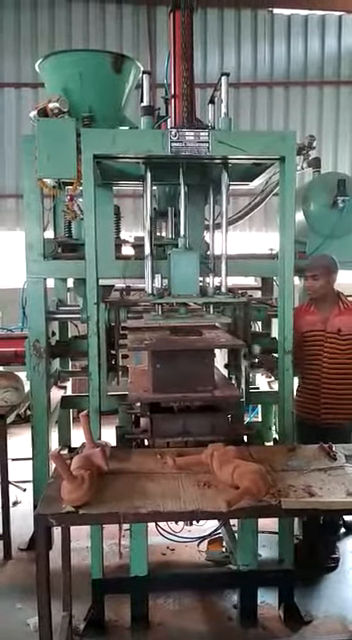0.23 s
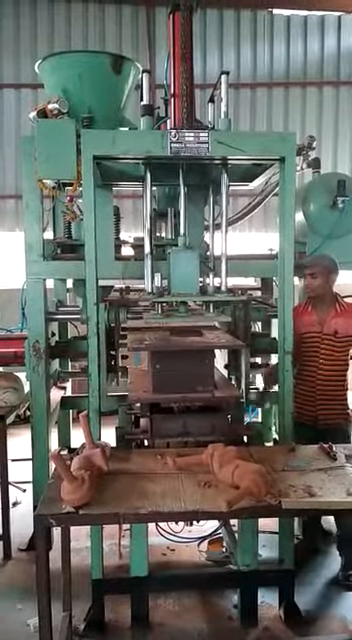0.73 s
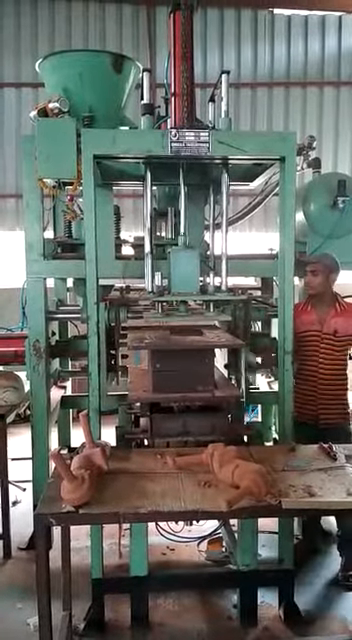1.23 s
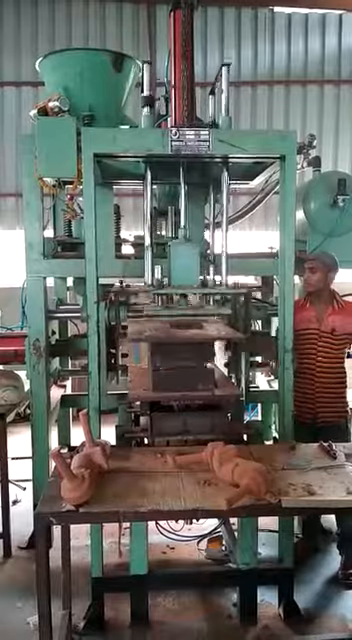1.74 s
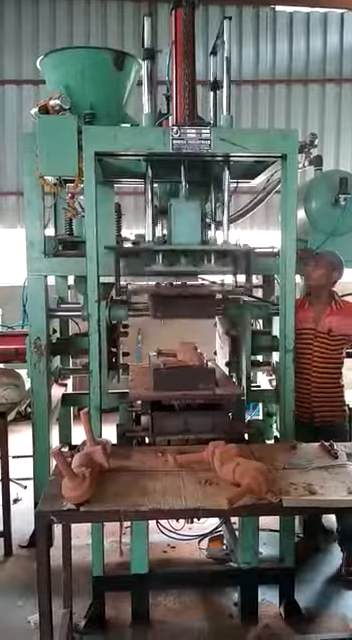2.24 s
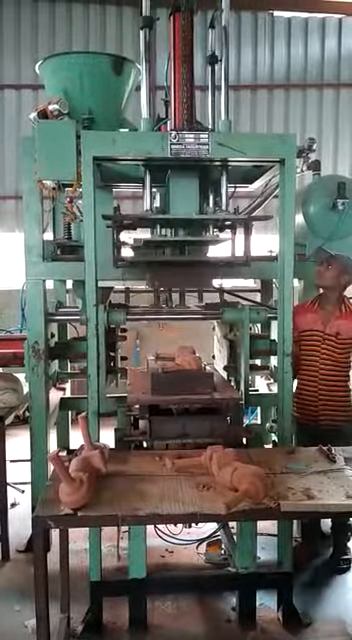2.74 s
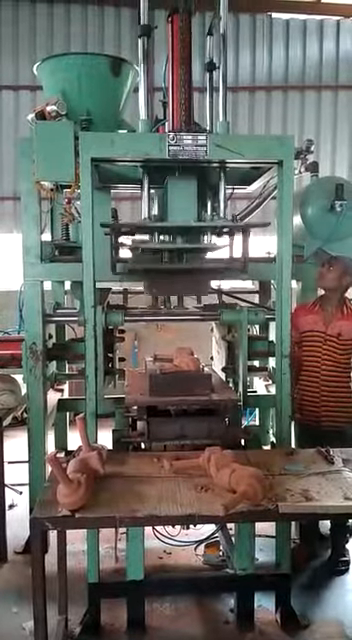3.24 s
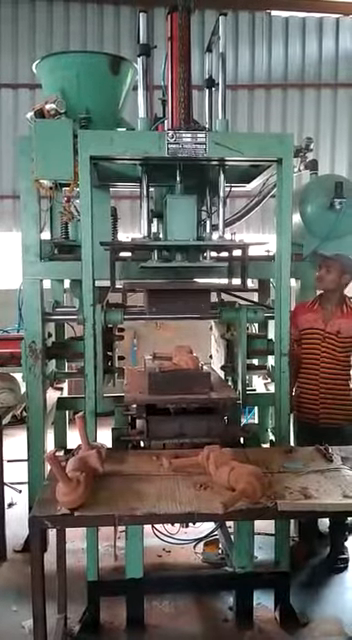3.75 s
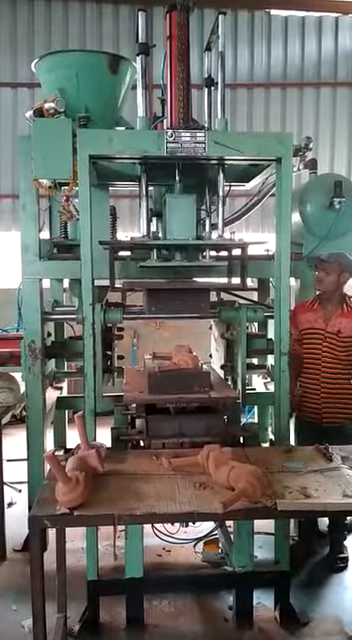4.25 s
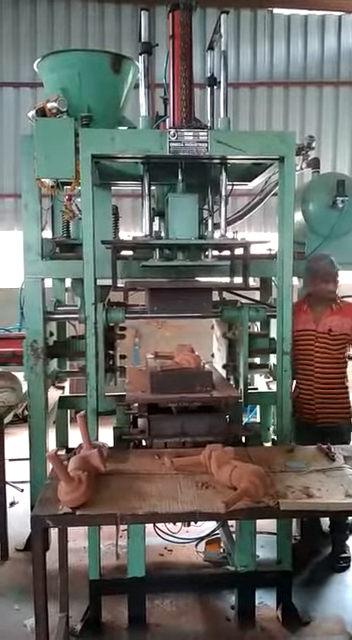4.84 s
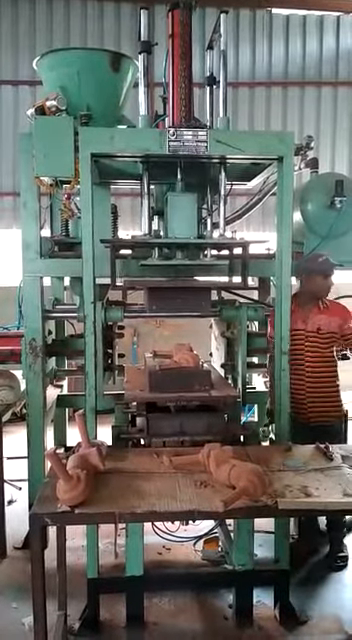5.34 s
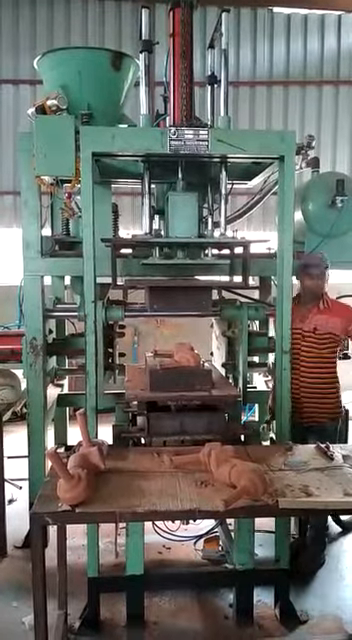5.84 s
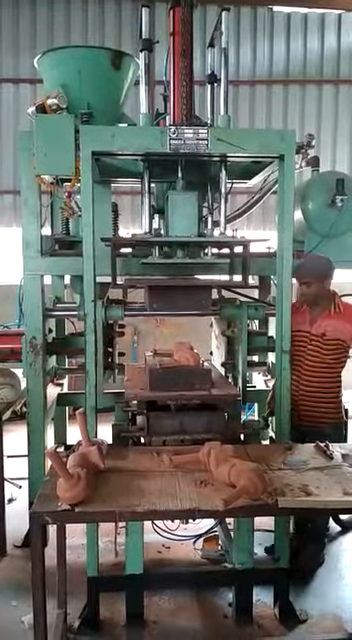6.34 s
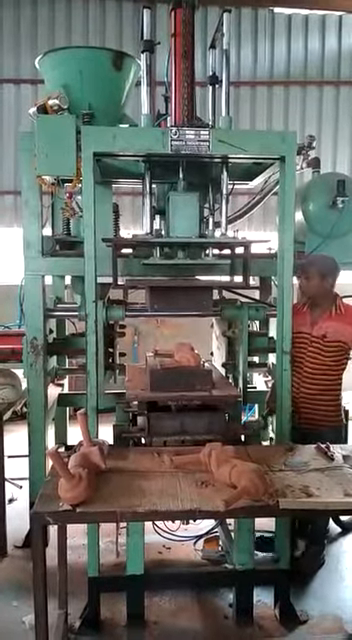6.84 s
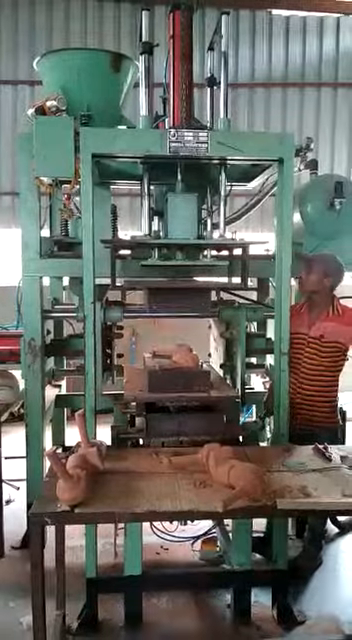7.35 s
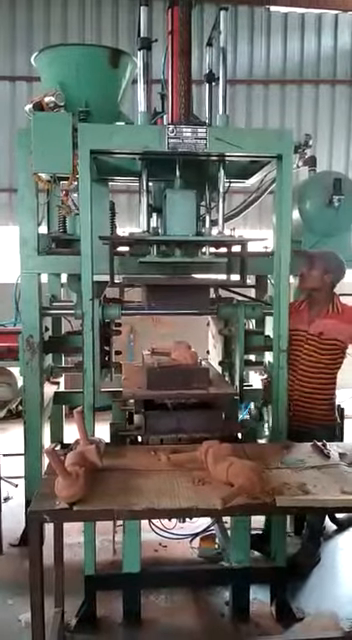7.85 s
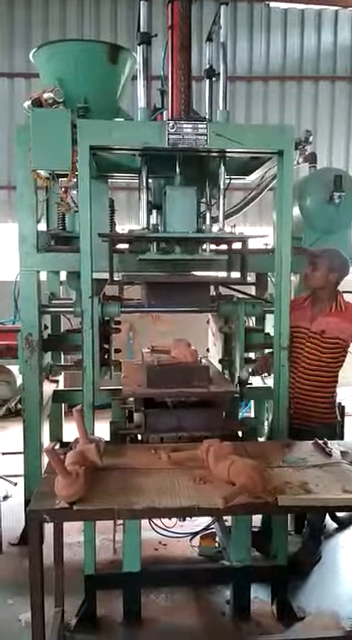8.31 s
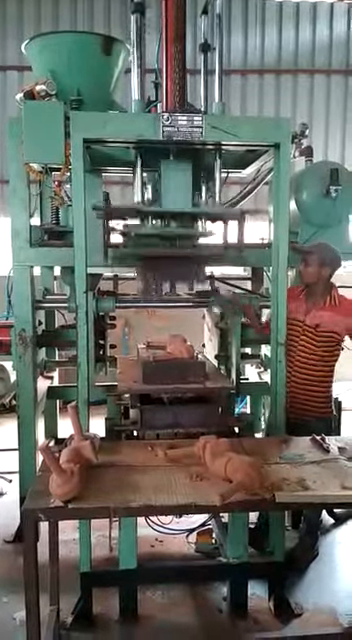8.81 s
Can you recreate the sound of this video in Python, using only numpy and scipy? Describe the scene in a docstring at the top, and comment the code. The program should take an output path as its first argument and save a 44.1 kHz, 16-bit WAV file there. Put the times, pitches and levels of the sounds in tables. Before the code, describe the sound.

A pneumatic foundry press hisses and hammers, steel tooling clanks, then a roaring air blast and sharp exhaust, ending with a rising hiss and loud clank.

```python
"""A pneumatic core shooter runs through a cycle in a sheet-metal workshop, over motor hum, hall murk and leak hiss.
First a loose part hammers in even thuds while valves vent coloured noise; pistons push air through their ports.
From 1.2 s steel tooling clanks as decaying modes and noise, slides in chattering noise, and seals groan as sines.
After a puff, the sand shot at 3.9 s and the blow-down at 4.5 s roar as noise through the head's resonances.
A last stroke from 7.4 s whistles and whines up to the closing clank at 8.8 s; a low shudder comes and goes."""
import sys
import numpy as np
from scipy import signal
from scipy.fft import rfft, irfft, next_fast_len
from scipy.io import wavfile
from scipy.ndimage import uniform_filter1d, map_coordinates

SR = 44100
rng = np.random.default_rng(int(sys.argv[2]) if len(sys.argv) > 2 else 0)


def to_wav(sig):
    """Store sig (one row per channel, or 1-D mono) as 16-bit WAV at the path in sys.argv[1].

    Samples outside -1..1 are clipped; the rate is SR.
    """
    pcm = np.clip(np.atleast_2d(sig), -1, 1) * 32767
    pcm = np.round(pcm).astype(np.int16)
    wavfile.write(sys.argv[1], SR, pcm.T)  # frames by channels


N = 400428

# a small puff of air before the shot [t/s, attack/s, hold/s, level/dB]
PUFFS = [(3.322, 0.082, 0.37, -26.5)]
PUFF_SAG_DB_PER_S = 65
# the sand shot [t/s, attack/s, hold/s, level/dB]
SHOTS = [(3.861, 0.025, 0.22, -6.5)]
SHOT_SAG_DB_PER_S, SHOT_RELEASE_DB_PER_S = 87, 229
# the head blowing down, its valve first cracked and then wide open [t/s, hold/s, level/dB]
BLOWDOWNS = [(4.475, .04, -30), (4.511, 0.12, -12.5)]
BLOWDOWN_ATTACK_S, BLOWDOWN_SAG_DB_PER_S, BLOWDOWN_RELEASE_DB_PER_S = 0.013, 90, 318
# resonances of the shooting head [f/Hz, width/Hz, level in the shot/dB, level in the blow-down/dB]
HEAD_RESONANCES = [(174, 34, -30, 16.5), (289, 130, 16, 0), (392, 31, 17, 8), (780, 19, 13, 7),
                   (970, 38, 17.5, 13), (1083, 15, 12, -3), (1360, 5.8, 21, 15.5), (1597, 30, 5, 11.5)]
# air of puff, shot and blow-down [f/Hz, relative density/dB per Hz]
SHOT_SPECTRUM = [(60, -29), (170, -11.5), (900, -0.5), (1500, 7), (4000, -1.5), (7500, -8.5), (11500, -34),
                 (15000, -76)]

# air leaving the valve silencers [t/s, attack/s, hold/s, level/dB]
VENTS = [(0.35, 0.021, 0.62, -18.5), (0.817, 0.048, 0.023, -22.5), (3.178, 0.019, 0.48, -17.5),
         (3.861, 0.022, 0.019, -14.5), (4.505, 0.023, 0.051, -24), (4.581, 0.061, 0.038, -20.5)]
VENT_SAG_DB_PER_S, VENT_RELEASE_DB_PER_S = 12, 190
# air bleeding through a throttle [t/s, attack/s, hold/s, level/dB, drift/dB per s]
BLEEDS = [(0.37, 0.059, 0.76, -29, 4), (1.25, .17, 0.12, -31, -76), (1.78, 0.0038, 0.0043, -19, 0),
          (1.852, 0.16, 0.89, -55.5, 21.5), (4.57, 0.17, 0.983, -26.5, 3), (5.7, 0.11, 0.91, -42.5, 0.5),
          (7.4, 0.56, 0.87, -39.5, -11)]
BLEED_RELEASE_DB_PER_S = 266
# swells of the leaking fittings over their steady hiss [t/s, attack/s, hold/s, level/dB]
LEAK_SWELLS = [(4.348, 0.66, 2.66, -33.5)]
LEAK_DB, LEAK_SAG_DB_PER_S, LEAK_RELEASE_DB_PER_S = -43.5, 0.6, 17
# hisses of the vents, their top treble, the throttle and the leaks [f/Hz, relative density/dB per Hz]
VENT_SPECTRUM = [(100, -31.5), (1000, -31), (2200, -11.5), (4800, -10.5), (5200, -2.5), (9300, 2.5),
                 (11800, 8.5), (12400, -42), (15800, -50)]
TOP_TREBLE_SPECTRUM = [(10500, -44), (12600, -9), (15800, -24)]
BLEED_SPECTRUM = [(1000, -45), (4850, -13.5), (5100, 3), (6500, 6.5), (9400, 5), (9650, -12), (11200, 0),
                  (12700, -14), (15300, -12), (15600, -1)]
LEAK_SPECTRUM = [(1000, -34.5), (3500, -11), (6300, -4), (8500, -5.5), (11400, 4), (15800, -2)]

# steel meeting its stops and rebounding
# [t/s, clatter level/dB, low ring level/dB, brightness/dB per octave]
CONTACTS = [(1.161, -20.5, -40, -0.5), (1.178, -19, -10.5, -2), (1.214, -26.5, -10.5, -2.5),
            (1.272, -26, -15, 1), (1.389, -33, -18.5, -15), (1.783, -5.5, -0.5, -3.5), (1.827, -39, 0, -3),
            (1.907, -26, -14.5, -4), (2.013, -35, -20.5, -10), (3.869, -9.5, -3, -1),
            (4.462, -31, -35, -2.5), (8.793, -5, -3.5, -2.5), (8.942, -26, -26, -0.5),
            (8.98, -28.5, -29, 0.5)]
# higher modes of the steel frame [f/Hz, level/dB]
FRAME_MODES = [(535, -11.5), (694, -9), (790, -5), (926, -4), (1070, -7), (1340, -7)]
FRAME_T60_S = 0.29
# dense ringing of the steel plates [f/Hz, relative density/dB per Hz]
PLATE_SPECTRUM = [(100, -50), (290, -20.5), (400, -7.5), (650, -4), (1350, -6.5), (1900, -14),
                  (15000, -64.5)]
BEND_HZ, BEND_T60_S, BEND_RISE_S = 393.8, 0.18, 0.014  # the whole frame bending, its pitch before scatter

# piston strokes, heard as air in the ports [t/s, attack/s, hold/s, level/dB, drift/dB per s]
STROKES = [(0.341, 0.043, 0.5, -26.5, -0.5), (0.95, 0.21, 1.9, -36, -13), (2.024, .3, 0.55, -39, 5.5),
           (7.444, 0.043, 4.8, -41.5, 0)]
PORT_RELEASE_DB_PER_S = 116
# soft gusts from the cylinder ports [t/s, hold/s, level/dB]
PORT_GUSTS = [(2.47, 0.052, -41), (7.48, 0.098, -40.5), (7.77, 0.029, -44)]
GUST_ATTACK_S = 0.036
# air whistling in a port on the last stroke [t/s, attack/s, hold/s, level/dB, f/Hz, width/Hz]
WHISTLES = [(7.754, 0.55, 0.95, -43, 7910, 714)]
# piston seals singing as they slide [t/s, attack/s, hold/s, level/dB, f/Hz, glide/Hz per s]
SEAL_NOTES = [(2.418, 0.017, 0.013, -40.5, 487, 0), (2.539, 0.013, 0.06, -41, 475, -180),
              (2.668, 0.036, 0.065, -43.5, 451, -150), (7.4, 1.25, .12, -52.5, 785, 89.5)]
SEAL_RELEASE_DB_PER_S = 220
# air of the strokes and of the gusts [f/Hz, relative density/dB per Hz]
PORT_SPECTRUM = [(200, -13.5), (1250, -5.5), (1530, 6), (1950, 1.5), (3800, -5.5), (5300, -1.5),
                 (7400, 1.5), (9200, -14), (11700, 5.5), (15000, -22)]
GUST_SPECTRUM = [(1100, -22), (1480, -2), (2400, -14), (4500, -23)]

# tooling sliding along its guides [t/s, attack/s, hold/s, level/dB, drift/dB per s]
SCRAPES = [(1.234, 0.083, 0.94, -33, -24), (2.255, 0.09, .58, -49.5, 4), (7.9, 0.77, 0.74, -49, 30)]
SCRAPE_RELEASE_DB_PER_S = 80
# tooling catching on a guide [t/s, level/dB]
GUIDE_SNAGS = [(1.35, -30.5), (2.3, -36), (8.529, -38)]
SNAG_ATTACK_S, SNAG_HOLD_S, SNAG_RELEASE_DB_PER_S = 0.018, 0.047, 109
# resonance of the guide rods [f/Hz, width/Hz, level/dB]
ROD_RESONANCE = [(1520, 57, 14.5)]

# a loose part hammering [t/s, attack/s, hold/s, level/dB]
HAMMER_RUNS = [(-.015, 0, 0.408, -27.5), (0.054, 0.78, 0.04, -35.5)]
KNOCKS_PER_S, KNOCK_RELEASE_DB_PER_S = 22.9, 600
# panel modes rung by each knock [f/Hz, level/dB, t60/s]
HAMMER_MODES = [(121.5, 2.5, 0.13), (252, -10.5, 0.13)]
KNOCK_ROCK_DB = -3  # the frame rocking, relative to the knocks' level

# the frame shuddering under load [t/s, attack/s, hold/s, sway level/dB, panel rattle level/dB]
SHUDDERS = [(1.249, 0.094, 0.39, -52, -41), (1.927, 0.083, 0.66, -50, -44),
            (2.917, 0.057, 0.22, -43.5, -46), (3.58, 0.14, 0.85, -49.5, -44),
            (7.615, 0.4, 0.85, -32, -42.5)]
SHUDDER_RELEASE_DB_PER_S = 255
# jolts that shake the panels [t/s, level/dB]
PANEL_JOLTS = [(2.31, -38.5), (3.863, -20.5), (4.511, -29)]
JOLT_ATTACK_S, JOLT_RELEASE_DB_PER_S = 0.0049, 180
# resonance of a jolted frame [f/Hz, width/Hz, level/dB]
THUD_RESONANCE = [(178, 64, 35)]
# rattling panels and the swaying frame [f/Hz, relative density/dB per Hz]
PANEL_SPECTRUM = [(80, -1), (113, -5), (140, -6), (220, -2.5), (1500, -30), (5000, -61)]
SWAY_SPECTRUM = [(20, -21), (40, -9), (62, -13.5), (150, -49.5)]

# motors in the hall [f/Hz, level/dB]
MOTOR_HUM = [(48.4, -67)]
# murk of the workshop [f/Hz, relative density/dB per Hz]
HALL_SPECTRUM = [(25, 2), (106, -4), (190, -6), (500, -12), (3000, -10), (6000, -103)]
# how alike the hall makes the two sides [f/Hz, left-right correlation]
LEFT_RIGHT_LIKENESS = [(150, 0.97), (330, 0.72), (1300, 0.003)]
TOP_HZ = 16000  # band limit


def amp(db):
    """Gain of a level in dB."""
    return 10 ** (np.asarray(db) / 20)


def unit(x):
    """Scale to rms 1."""
    return x / np.sqrt(np.mean(np.abs(x) ** 2) + 1e-20)


def along(points, hz):
    """Read a curve of (Hz, value) points on a log frequency axis."""
    f, v = np.transpose(points)
    return np.interp(np.log(hz + 1), np.log(f + 1), v)


def wobble(rate):
    """A smooth random curve, rate knots a second."""
    knots = rng.standard_normal(int(N * rate / SR) + 4)
    return map_coordinates(knots, [np.arange(N) * rate / SR])


def pan(db):
    """Gains that put a source db more to the left."""
    return amp([[db / 2], [-db / 2]])


def envelope(s, attack, hold, db, drift, release):
    """Gain: swell from time s, hold while drifting, then die away (drift and release in dB per s)."""
    t = np.arange(N) / SR - s
    swell = np.clip(t / attack, 0, 1) ** 2
    drifted_db = db + drift * np.clip(t - attack, 0, hold)
    return swell * amp(drifted_db - release * np.maximum(t - attack - hold, 0))


def together(gains):
    """Overlapping flows add in power."""
    return np.sqrt(sum(gain ** 2 for gain in gains))


def noise(spectrum, peaks=(), size=N):
    """Stereo noise of rms 1 as the hall spreads it, coloured by a spectrum and (Hz, width, dB) resonances."""
    m = next_fast_len(size)
    hz = np.fft.rfftfreq(m, 1 / SR)
    power = 1
    for centre, width, db in peaks:
        power = power + amp(db) ** 2 / (1 + (2 * (hz - centre) / width) ** 2)
    colour = amp(along(spectrum, hz)) * np.sqrt(power)
    # split each frequency between mid and side to set the left-right likeness
    turn = np.arccos(np.clip(along(LEFT_RIGHT_LIKENESS, hz), -1, 1)) / 2
    gain = colour * np.array([np.cos(turn), np.sin(turn)])
    mid, side = irfft(rfft(rng.standard_normal((2, m))) * gain, m)[:, :size]
    return unit(np.array([mid + side, mid - side]))


def air(spectrum, flutter_db, varied_db, peaks=()):
    """Noise with a quick level flutter, its treble gains varied at random, partly over time, partly per frequency."""
    hz, _, z = signal.stft(noise(spectrum, peaks), SR, nperseg=2048)
    passing = uniform_filter1d(rng.standard_normal(z.shape[1:]), size=5, axis=0)
    passing = unit(uniform_filter1d(passing, size=7, axis=1))
    # a fixed random gain per frequency gives the hiss a fine-grained colour
    fixed = 2 * np.minimum(rng.standard_normal((len(hz), 1)), 1)
    depth = varied_db * np.clip((hz[:, None] - 700) / 3000, 0, 1)
    varied = z * amp(depth * (passing + fixed))
    flow = unit(signal.istft(varied, nperseg=2048)[1][:, :N])
    return flow * amp(flutter_db * unit(wobble(25) + wobble(160)))


def shooting_head():
    """A puff escapes in the open; the shot and the brighter blow-down roar through the head's cavities."""
    shot_peaks = [(hz, width, db) for hz, width, db, _ in HEAD_RESONANCES]
    blowdown_peaks = [(hz, width, db) for hz, width, _, db in HEAD_RESONANCES]
    brighter = [(hz, db + 0.35 * np.log2(hz)) for hz, db in SHOT_SPECTRUM]
    escape = together(envelope(*row, -PUFF_SAG_DB_PER_S, SHOT_RELEASE_DB_PER_S) for row in PUFFS)
    inflow = together(envelope(*row, -SHOT_SAG_DB_PER_S, SHOT_RELEASE_DB_PER_S) for row in SHOTS)
    outflow = together(
        envelope(s, BLOWDOWN_ATTACK_S, hold, db, -BLOWDOWN_SAG_DB_PER_S, BLOWDOWN_RELEASE_DB_PER_S)
        for s, hold, db in BLOWDOWNS)
    puff = escape * air(SHOT_SPECTRUM, flutter_db=.8, varied_db=2)
    shot = inflow * air(SHOT_SPECTRUM, flutter_db=.8, varied_db=2, peaks=shot_peaks)
    blowdown = outflow * air(brighter, flutter_db=.8, varied_db=2, peaks=blowdown_peaks)
    return (puff + shot + blowdown) * pan(db=1.5)


def valves():
    """Vents, throttle and leaks hiss as fluttering noise, each with the colour and swell of its own flow."""
    flow = together(envelope(*row, -VENT_SAG_DB_PER_S, VENT_RELEASE_DB_PER_S) for row in VENTS)
    throttle = together(envelope(*row, BLEED_RELEASE_DB_PER_S) for row in BLEEDS)
    swells = [envelope(*row, -LEAK_SAG_DB_PER_S, LEAK_RELEASE_DB_PER_S) for row in LEAK_SWELLS]
    seep = together([amp(LEAK_DB)] + swells)
    rush = flow * air(VENT_SPECTRUM, flutter_db=.2, varied_db=2)
    # a vent's top treble is given a level that fades faster than the rest of its hiss
    treble_gain = amp(-15) * (flow / flow.max()) ** 2
    top_treble = treble_gain * air(TOP_TREBLE_SPECTRUM, flutter_db=.2, varied_db=2)
    bleed = throttle * air(BLEED_SPECTRUM, flutter_db=.15, varied_db=2)
    leak = seep * air(LEAK_SPECTRUM, flutter_db=.1, varied_db=2.5)
    return rush * pan(db=1.3) + top_treble * pan(db=3.5) + bleed + leak


def clanks():
    """Each contact bends the frame anew, rings its higher modes and rattles its plates, which linger."""
    out = np.zeros((2, N + SR))
    t = np.arange(SR * 3 // 4) / SR
    gaps = np.diff([row[0] for row in CONTACTS], append=N / SR)
    for (s, db, low_db, bright), gap in zip(CONTACTS, gaps):
        # the next contact damps the bending
        free = np.exp(-np.maximum(t - gap, 0) / BEND_RISE_S)
        bend_hz = BEND_HZ * (1 + rng.normal(0, .015))
        bend_gain = amp(low_db - 60 * t / BEND_T60_S) * (1 - np.exp(-t / BEND_RISE_S)) * free
        bend = bend_gain * np.sin(2 * np.pi * bend_hz * t)
        ring = 0
        for hz, mode_db in FRAME_MODES:
            # higher modes depend on where the blow lands and reach the two sides differently
            own_db = bright * np.log2(hz / 900) + rng.normal(0, 2, (2, 1))
            phase = rng.uniform(0, 2 * np.pi) + rng.normal(0, hz / 1000, (2, 1))
            mode_gain = amp(mode_db + own_db - 60 * t / FRAME_T60_S) * (1 - np.exp(-t * hz))
            ring = ring + mode_gain * np.sin(2 * np.pi * hz * t + phase)
        colour = [(hz, v + bright * np.log2(min(hz, 3000) / 900)) for hz, v in PLATE_SPECTRUM]
        rattle = amp(1.7 * wobble(110)[:len(t)])
        # a quick decay with a quieter, lingering tail
        decay = amp(-60 * t / 0.29) + amp(-15.5 - 60 * t / 0.92)
        dense = rattle * noise(colour, size=len(t)) * decay * (1 - np.exp(-t / 0.0041))
        out[:, round(s * SR):][:, :len(t)] += bend + amp(db) * (ring + dense)
    left, right = out[:, :N] * pan(db=1.5)
    return np.array([np.roll(left, 16), right])  # the left side lags by 16 samples


def cylinders():
    """Air rushes, gusts and whistles through the ports as pistons travel; seals groan unevenly or whine."""
    travel = together(envelope(*row, PORT_RELEASE_DB_PER_S) for row in STROKES)
    gusts = together(envelope(s, GUST_ATTACK_S, hold, db, 0, PORT_RELEASE_DB_PER_S)
                     for s, hold, db in PORT_GUSTS)
    out = travel * air(PORT_SPECTRUM, flutter_db=.5, varied_db=3)
    out = out + gusts * air(GUST_SPECTRUM, flutter_db=1, varied_db=2)
    for s, attack, hold, db, hz, width in WHISTLES:
        band = [(hz - 2 * width, -60), (hz - width, -10), (hz, 0), (hz + width, -10), (hz + 2 * width, -60)]
        out = out + envelope(s, attack, hold, db, 0, PORT_RELEASE_DB_PER_S) * noise(band)
    for s, attack, hold, db, hz, glide in SEAL_NOTES:
        pitch = hz + glide * (np.arange(N) / SR - s)
        grip = amp(3.2 * wobble(25))
        slip = .8 * wobble(90)  # phase wander in radians
        note = grip * np.sin(2 * np.pi * np.cumsum(pitch) / SR + slip)
        out = out + envelope(s, attack, hold, db, 0, SEAL_RELEASE_DB_PER_S) * note
    return out


def guides():
    """Sliding steel chatters, exciting plates and rods as fluttering noise; a snag is a brighter burst."""
    brighter = [(hz, db + 4 * np.log2(hz)) for hz, db in PLATE_SPECTRUM]
    slide = together(envelope(*row, SCRAPE_RELEASE_DB_PER_S) for row in SCRAPES)
    snag = together(envelope(s, SNAG_ATTACK_S, SNAG_HOLD_S, db, 0, SNAG_RELEASE_DB_PER_S)
                    for s, db in GUIDE_SNAGS)
    sliding = air(PLATE_SPECTRUM, flutter_db=1.9, varied_db=2, peaks=ROD_RESONANCE)
    catching = air(brighter, flutter_db=1.9, varied_db=2)
    surge = amp(1.5 * wobble(10))  # the guides bind and run free
    return slide * surge * sliding + snag * catching


def knocking():
    """Quick, even knocks of uneven strength: each thuds, rings low panel modes and rocks the frame twice."""
    period = 1 / KNOCKS_PER_S
    since = (np.arange(N) / SR - HAMMER_RUNS[0][0]) % period
    ring = sum(amp(db - 60 * since / t60) * np.sin(2 * np.pi * hz * since) for hz, db, t60 in HAMMER_MODES)
    # the returning part damps the panel
    ring = ring * np.clip((period - since) / JOLT_ATTACK_S, 0, 1)
    thud = amp(-6.5 - 60 * since / 0.28) * (1 - np.exp(-since / 0.0013)) * noise(PANEL_SPECTRUM)
    rock = -amp(KNOCK_ROCK_DB) * np.cos(2 * np.pi * 2 * since / period)
    force = together(envelope(*row, 0, KNOCK_RELEASE_DB_PER_S) for row in HAMMER_RUNS)
    knocks = amp(2 * wobble(23)) * (ring + thud)
    return force * (knocks + amp(wobble(12)) * rock) * pan(db=2.4)


def shudder():
    """The frame throbs at its lowest resonance and shakes its panels; shaken hard, they buzz at triple rate."""
    throb_hz = 38.8 * (1 + 0.019 * wobble(17))
    phase = 2 * np.pi * np.cumsum(throb_hz) / SR
    load = together(envelope(s, attack, hold, db, 0, SHUDDER_RELEASE_DB_PER_S)
                    for s, attack, hold, db, _ in SHUDDERS)
    shake = together(envelope(s, attack, hold, db, 0, SHUDDER_RELEASE_DB_PER_S)
                     for s, attack, hold, _, db in SHUDDERS)
    jolt = together(envelope(s, JOLT_ATTACK_S, 0, db, 0, JOLT_RELEASE_DB_PER_S) for s, db in PANEL_JOLTS)
    sway = load * (np.sin(phase) + amp(-8) * noise(SWAY_SPECTRUM))
    buzz = amp(-6.5) * np.sqrt(shake / shake.max()) * np.sin(3 * phase)
    panels = shake * (amp(-3.5) * noise(PANEL_SPECTRUM) + buzz) * amp(2 * np.sin(phase))
    thud = jolt * noise(PANEL_SPECTRUM, THUD_RESONANCE)  # too brief to sway the frame
    return (sway + panels + thud) * pan(db=2.4)


def hall():
    """Distant motors hum as sines of wandering phase over the workshop's steady low noise."""
    t = np.arange(N) / SR
    hum = sum(amp(db) * np.sqrt(2) * np.sin(2 * np.pi * hz * t + .5 * wobble(3.1)) for hz, db in MOTOR_HUM)
    return hum + amp(-55.0) * noise(HALL_SPECTRUM)


def scene():
    """The machine's sources summed over the hall."""
    machine = shooting_head() + valves() + clanks() + cylinders() + guides() + knocking() + shudder()
    return machine + hall()


def record(dry):
    """Gain control ducks under loud sounds and recovers steadily; nothing is kept above the band limit."""
    power = np.abs(uniform_filter1d(np.mean(dry ** 2, axis=0), SR // 100))  # over 10 ms
    loud_db = 10 * np.log10(power + 1e-12)
    excess = np.maximum(loud_db + 13.5, 0)
    recovery = 55 * np.arange(N) / SR  # 55 dB per s
    # the running peak holds each reduction while the recovery ramp lets it go
    held = dry * amp(recovery - np.maximum.accumulate(excess + recovery))
    m = next_fast_len(N + SR // 2)
    kept = np.fft.rfftfreq(m, 1 / SR) < TOP_HZ
    return irfft(rfft(held, m) * kept, m)[:, :N]


dry = scene()
out = record(dry)
to_wav(out)
```